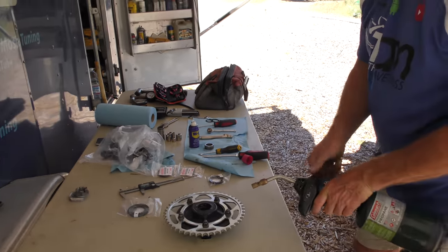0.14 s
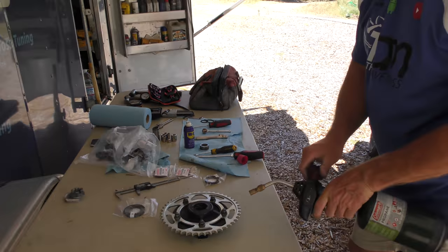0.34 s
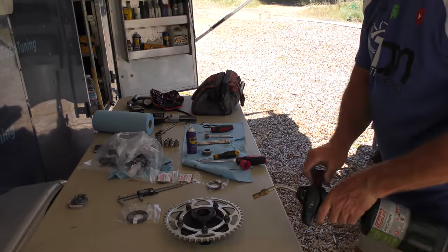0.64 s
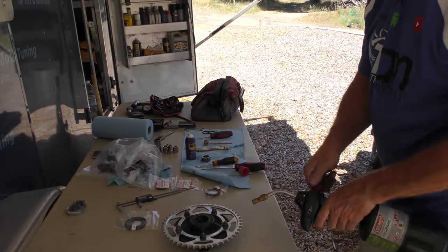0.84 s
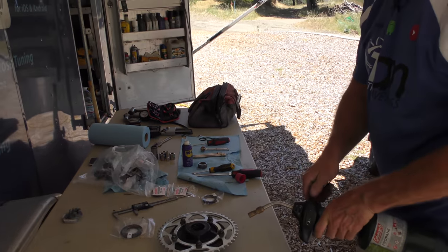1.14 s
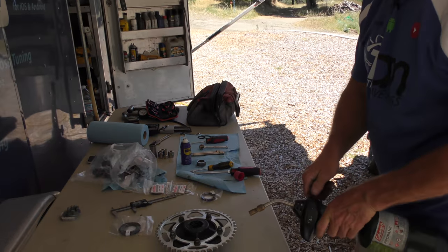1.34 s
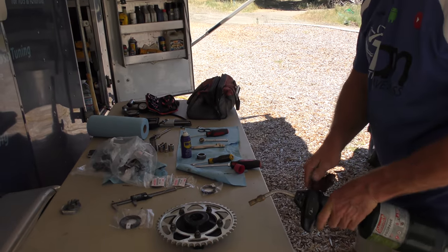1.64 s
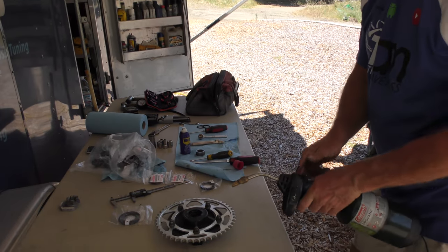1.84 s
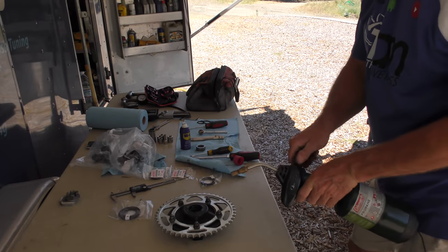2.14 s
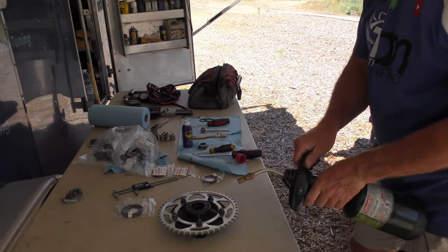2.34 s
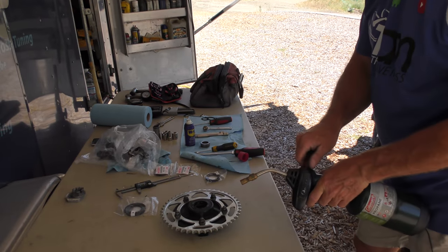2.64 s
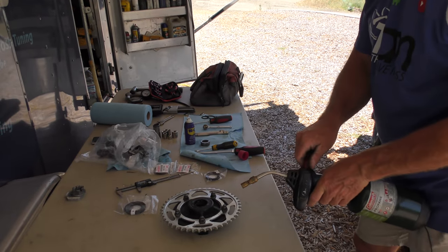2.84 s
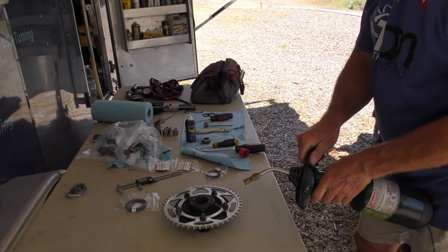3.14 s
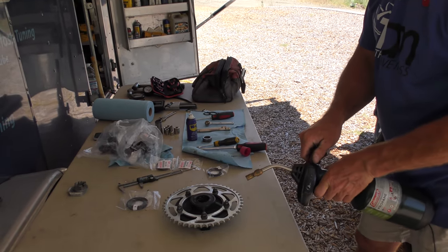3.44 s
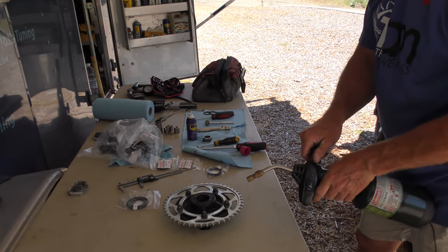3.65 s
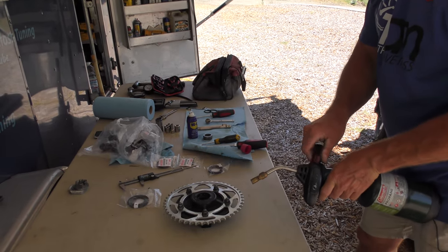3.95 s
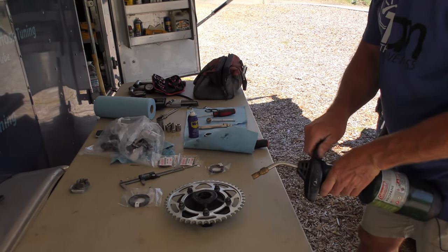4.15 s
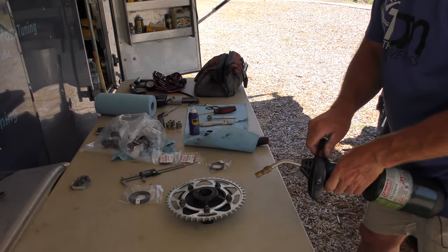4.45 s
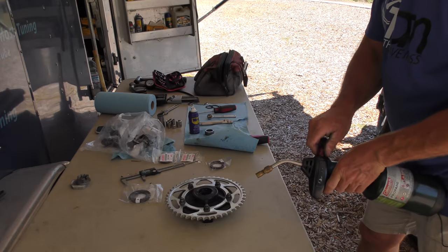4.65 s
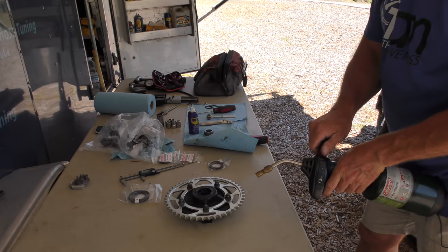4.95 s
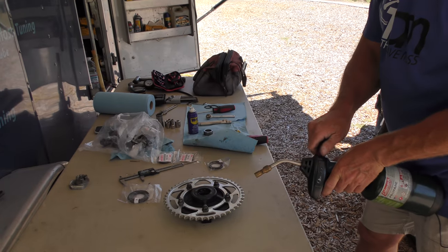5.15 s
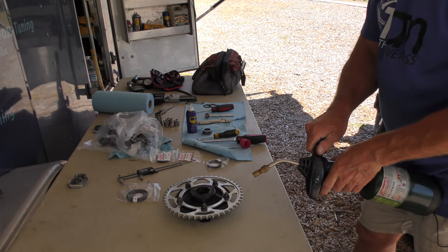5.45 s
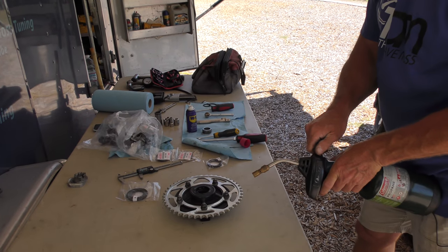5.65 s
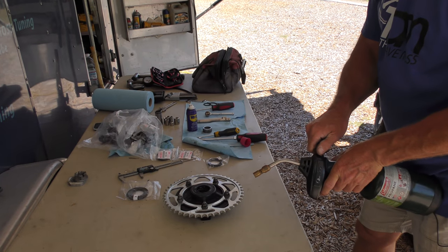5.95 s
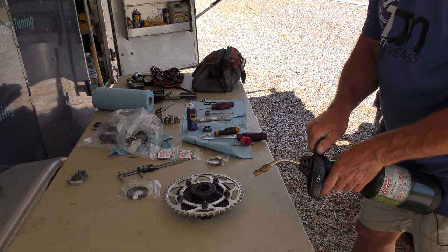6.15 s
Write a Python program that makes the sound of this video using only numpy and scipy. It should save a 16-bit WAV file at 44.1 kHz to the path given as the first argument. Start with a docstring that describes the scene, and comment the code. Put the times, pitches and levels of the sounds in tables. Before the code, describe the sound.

Close outdoor sound of a hand-held gas torch: a thin high hiss with small trigger clicks, then a fluttering, rushing flame for about two seconds that cuts off abruptly. The knob ticks and squeaks faintly over soft gas hiss. A loud igniter snap fails to light it; a second snap about a second later starts a steady roar to the end. Light breeze rumbles low on the microphone.

```python
"""A hand-held propane torch burns as turbulent noise in four bands, combed by an echo from an outdoor table.
Unlit gas hisses first as coloured noise and a narrow jet; a fluttering flame catches, burns two seconds and dies.
The valve knob creaks in gliding harmonic tones, and clicks are short noise bursts with pings and knocks.
The igniter snaps once in vain, then again, each a noise crack with ringing modes, and a roar holds.
A light breeze of low, gusty noise rumbles underneath."""
import sys
import numpy as np
from scipy import signal
from scipy.fft import rfft, irfft, next_fast_len
from scipy.io import wavfile
from scipy.ndimage import map_coordinates

SR = 44100
rng = np.random.default_rng(int(sys.argv[2]) if len(sys.argv) > 2 else 0)


def digitize_waveform(pressure):
    """Quantize a signal to 16-bit integers and store it at the path in sys.argv[1].

    Rows of a 2-D input are taken as channels; values are limited to [-1, 1].
    """
    field = np.atleast_2d(pressure).T
    bounded = np.clip(field, -1, 1)
    quanta = np.round(bounded * 32767).astype(np.int16)
    wavfile.write(sys.argv[1], SR, quanta)


N = 277212
TIME = np.arange(N) / SR
FFT_SIZE = 2 * next_fast_len(N // 2 + 1)
FREQS = np.maximum(np.fft.rfftfreq(FFT_SIZE, 1 / SR), 1)

# All colour and slope tables give relative spectral density; response() scales them to unit power.
# Unlit gas in the burner tube: (time [s], level [dB])
GAS_LEVEL = [(0, -57.5), (0.4, -63), (3.1, -57.5), (3.6, -56.5), (4.45, -50.5), (4.6, -55), (6.29, -79)]
# Slope of the unlit gas noise: (frequency [Hz], density [dB per Hz])
GAS_SPECTRUM = [(150, 0), (300, 9.5), (600, 8), (1300, 4.5), (2200, -0.5), (4000, 0), (7000, 1.5),
                (9500, -0.5), (12000, -4.5), (16000, -7)]
# Resonances of the burner tube: (centre [Hz], width [Hz], height [dB])
TUBE_RESONANCES = [(1320, 65, 13.5), (2726, 110, 10.5), (4050, 650, 8), (4800, 640, -6), (6040, 460, 3),
                   (9500, 1300, 4.5)]
# Thin jet of unlit gas: (time [s], pitch [Hz], relative flow [dB])
LEAK_JET = [(0, 12200, -4), (0.12, 13000, 0.5), (0.21, 12400, -1.5), (0.27, 11300, -8), (0.35, 11700, -19),
            (0.42, 11400, -18)]
# Soft rush around the jet: (frequency [Hz], density [dB per Hz])
LEAK_RUSH_COLOUR = [(120, -32), (200, -12), (355, -5.5), (1120, -12), (1340, -23), (2150, -20.5),
                    (3810, -28), (4270, -20), (10000, -53), (13000, -66), (22000, -120)]
LEAK_RUSH_FOLLOWS = 0.44   # share of the flow's swing in dB
# Breeze: (time [s], level [dB])
BREEZE_LEVEL = [(0, -50.5), (0.7, -41.5), (1.35, -47.5), (1.95, -55), (2.6, -39), (3.2, -56), (3.8, -43.5),
                (4.25, -50), (4.65, -47), (4.85, -52), (5.8, -54), (6.29, -47.5)]
# Colour of the breeze: (frequency [Hz], density [dB per Hz])
BREEZE_SPECTRUM = [(15, -29), (28, -0.5), (52, -5), (80, -7.5), (120, -13), (200, -24.5), (400, -42.5),
                   (1500, -59.5)]
GUST_DB, GUSTS_PER_S = 2, 6.5
SHAKE_DB, SHAKE_T60_S = -32, 0.17   # low rumble that each igniter snap shakes loose
# Trigger and knob clicks: (time [s], relative tick [dB], tick pitch [Hz], hollow knock [dB])
HANDLE_CLICKS = [(0.134, -32, 6600, -36.5), (0.221, -37, 6060, -44), (0.261, -30, 5940, -50),
                 (0.292, -44, 3600, -40.5), (0.453, -23, 3670, -34), (0.461, -29, 1145, -33),
                 (0.508, -38.5, 1370, -31), (0.579, -41, 3850, -37), (0.616, -32, 6600, -47),
                 (1.7858, -27.5, 4145, -50), (2.04, -33, 5940, -50), (3.041, -35, 3540, -41),
                 (3.08, -56, 3500, -49.5), (3.189, -45, 3100, -42), (3.324, -43, 5900, -54),
                 (3.379, -34, 3550, -39), (3.425, -37, 3180, -45), (3.615, -36, 3600, -52),
                 (3.642, -25, 3370, -36), (3.645, -25.5, 3100, -39), (3.664, -47, 3070, -29.5),
                 (3.738, -19.5, 3570, -39), (3.854, -50, 3500, -47), (3.9692, -40, 3730, -48.5),
                 (4.1214, -39, 3160, -47), (4.2989, -27.5, 3680, -42.5), (4.339, -43, 3600, -45.5),
                 (4.4488, -31, 3030, -49), (4.651, -22.5, 3850, -35), (4.656, -19.5, 3320, -31),
                 (4.672, -33, 3140, -40)]
# Colour of a tick: (frequency [Hz], density [dB per Hz])
TICK_SPECTRUM = [(700, -3), (1900, -3), (2500, -18), (3200, 0.5), (3900, 3.5), (4900, -10.5), (6400, -1),
                 (8000, -13.5), (10000, -8), (16000, -20)]
# Colour of a knock: (frequency [Hz], density [dB per Hz])
KNOCK_SPECTRUM = [(100, -11), (400, -16), (600, -6), (780, 3), (1100, -10.5), (1700, -14), (2500, -20.5),
                  (6000, -40.5)]

# Fluttering flame: (time [s], strength [dB], relative brightness [dB])
FLUTTERING_FLAME = [(0.76, -36.5, -2), (0.98, -39, -1), (1.45, -35.5, -1.5), (1.55, -40, -1),
                    (1.70, -41.5, 0.5), (1.84, -44, -0.5), (1.93, -41.5, 0), (2.04, -37.5, -0.5),
                    (2.22, -35.5, -1.5), (2.43, -33.5, 0), (2.56, -36, -1.5), (2.63, -34, 0),
                    (2.69, -35.5, -1)]
# Steady flame: (time [s], strength [dB], relative brightness [dB])
STEADY_FLAME = [(4.52, -33, -1), (4.85, -33.5, 0), (5.17, -35.5, 0), (5.43, -32, -0.5), (5.55, -37, 0),
                (6.05, -37, -0.5), (6.21, -34, -0.5), (6.28, -41.5, 0.5)]
# Overall slope of the fluttering flame: (frequency [Hz], density [dB per Hz])
FLUTTERING_SPECTRUM = [(50, -34), (110, -13), (200, -1), (450, -3), (1300, -11.5), (2000, -16.5),
                       (4000, -25), (8000, -31.5), (15500, -44.1)]
# Overall slope of the steady flame: (frequency [Hz], density [dB per Hz])
STEADY_SPECTRUM = [(50, -36), (110, -16.5), (200, -6.5), (450, -2), (1300, -5.5), (2000, -11),
                   (4000, -14.5), (8000, -21), (15500, -33)]
# Peaks and dips from the burner and nearby surfaces: (centre [Hz], width [Hz], height [dB])
FLAME_RIPPLE = [(303, 50, 2.5), (371, 34, -8), (449.6, 80, 8.5), (520, 136, -2), (606.4, 51, 8),
                (743, 20, -8), (848, 56, 7), (974, 19, 4), (1004, 35, -15), (1050, 180, 6), (1220, 63, -1),
                (1272, 82, 8), (1377, 69, 10), (1790, 67, 7), (1950, 18, 8.5), (2176, 39, 13),
                (1515, 93, 5), (1640, 120, 5.5), (2308, 370, -6.5), (2930, 32, 1.5), (3360, 34, 1),
                (3600, 400, 3), (3950, 1140, 5), (4800, 68, 0), (5230, 700, -9), (6370, 1800, 3),
                (7470, 850, -5.5), (9100, 550, 1.5), (14100, 1137, 1)]
# Fluttering flame at the usual strength: roar, rush, hiss, sizzle (level [dB] each)
FLUTTERING_BAND_LEVELS = [-32, -35, -44.5, -52.5]
# Steady flame at the usual strength: roar, rush, hiss, sizzle (level [dB] each)
STEADY_BAND_LEVELS = [-35.5, -37, -45, -54]
# One row per flame band: (share of strength swing [dB per dB], share of brightness [dB per dB])
BAND_SHARES = [(.6, 0), (1, 2.7), (1, 0.49), (1.1, 3.6)]
USUAL_STRENGTH_DB = -37
# The flame nearly lifts off the nozzle: (time [s], dip [dB])
FLAME_FALTERS = [(0.95, -6), (1.255, -1.5), (1.637, -7), (2.12, -5.5)]
# The flame catches hold and its roar swells: (time [s], swell [dB])
FLAME_PUFFS = [(0.71, 0), (1.67, 7), (2.68, 3), (4.575, 6.5)]
FALTER_S, PUFF_S = 0.0089, 0.02
# Table echo, following the nozzle's height: (time [s], lag [ms])
ECHO_LAG = [(1.0, .735), (1.53, .76), (1.78, 1.02), (2.08, 1.13), (2.5, .96), (4.5, .93), (6.29, .89)]
SECOND_LIT_S, SECOND_ATTACK_S = 4.48, 0.044   # the second snap lights the steady flame

# Stick-slip of the knob: (start [s], length [s], start pitch [Hz], end pitch [Hz], level [dB])
KNOB_CREAKS = [(2.912, 0.016, 774, 705, -52), (2.962, 0.081, 676, 820, -47.5),
               (3.165, 0.062, 858, 675, -51.5), (3.719, 0.019, 737, 770, -42),
               (4.13, 0.047, 658, 784, -43.5), (4.196, 0.023, 880, 665, -42)]
# Harmonics of a creak: (multiple of the pitch [1], relative level [dB])
CREAK_HARMONICS = [(1, 0.5), (2, -10.5), (3, -18), (4, -14)]
FIDGETS_PER_S, FIDGET_SPAN = 7, (2.95, 4.3)   # span in s
FIDGET_TICK_DB, FIDGET_KNOCK_DB = -58, -52   # levels of the largest fidgets
# Igniter snaps: (time [s], level [dB], thump [dB], metal ring [dB])
IGNITER_SNAPS = [(3.445, -6, -13.5, -33.5), (4.4753, -7.5, -20, -36)]
# Colour of the crack: (frequency [Hz], density [dB per Hz])
CRACK_SPECTRUM = [(150, -5.5), (300, -5.5), (550, -9), (900, -4), (1300, -20), (2050, -2), (2600, -6.5),
                  (3300, -3.5), (3900, 10.5), (5000, -22.5), (6500, -5.5), (8200, -16.5), (10300, -4),
                  (13000, -23.5), (16000, -11)]
# Scatter from the table and the things on it: (frequency [Hz], density [dB per Hz])
SCATTER_SPECTRUM = [(150, -3), (320, 2), (560, -9), (1000, -6), (1450, 1), (2100, -3), (2600, -7),
                    (3200, 1.5), (3800, -0.5), (5000, -10.5), (6500, -8), (8200, -12.5), (10300, -9.5),
                    (16000, -18)]
# Ring of the metal torch head: (frequency [Hz], relative level [dB], t60 [s])
HEAD_MODES = [(1260, -14, 0.41), (1600, -13, 0.73), (1670, -14, 0.3), (3010, 0, 0.16), (3380, -13, 0.17),
              (3490, -2, 0.33), (3760, -13, 0.14), (4650, -20, 0.41), (6700, -16, 0.26)]
# Low modes of the plastic handle: (frequency [Hz], relative level [dB], t60 [s])
HANDLE_MODES = [(119, 0, 0.027), (200, -3, 0.04), (275, -6, .04), (405, -21, 0.028)]
# Soft jolts of the gas bottle in the hand: (start [s], length [s], frequency [Hz], level [dB])
BOTTLE_JOLTS = [(3.674, 0.096, 48.8, -24.5), (3.785, 0.037, 198, -42.5), (4.424, 0.11, 63, -29.5)]
STOPBAND_HZ = 16600


def from_db(db):
    """Logarithmic level: 20 dB is a tenfold amplitude."""
    return 10 ** (np.asarray(db) / 20)


def rms_one(x):
    """Power normalisation: scale to unit mean square."""
    return x / np.sqrt(np.mean(x ** 2) + 1e-20)


def in_time(rows):
    """Linear interpolation: each column of a curve at every sample."""
    times, *columns = np.transpose(rows)
    return [np.interp(TIME, times, column) for column in columns]


def between(start, end, fade):
    """Amplitude gating: a gain that opens from start and is shut by end."""
    return np.clip((TIME - start) / fade, 0, 1) * np.clip((end - TIME) / fade, 0, 1)


def swells(rows, width_s):
    """Gaussian level modulation: a brief bell-shaped change in dB at each event."""
    return sum(db * np.exp(-((TIME - s) / width_s) ** 2) for s, db in rows)


def response(slope, bells=()):
    """Spectral shaping: a smooth slope plus bell-shaped peaks and dips, at unit power."""
    hz, db = np.transpose(slope)
    curve = np.interp(np.log(FREQS), np.log(hz), db)
    # Below the first point the curve falls a further 24 dB per octave.
    curve = curve - 24 * np.maximum(np.log2(hz[0] / FREQS), 0)
    for centre, width, height in bells:
        curve = curve + height * np.exp(-4 * np.log(2) * ((FREQS - centre) / width) ** 2)
    return rms_one(from_db(curve))


def colour(x, gain):
    """Minimum-phase filtering: folding the cepstrum makes the filter causal, so nothing sounds early."""
    cepstrum = irfft(np.log(gain + 1e-6))
    fold = 1 + np.sign(FFT_SIZE / 2 - np.arange(FFT_SIZE))
    fold[0] = 1
    causal_gain = np.exp(rfft(cepstrum * fold))
    return irfft(rfft(x, FFT_SIZE) * causal_gain)[:N]


def noise(gain):
    """Stationary random noise: a white spectrum weighted by a gain, with rms 1."""
    white = rng.standard_normal(FFT_SIZE)
    return rms_one(irfft(rfft(white) * gain)[:N])


def drift(rate):
    """Low-pass random fluctuation: wandering up to about rate times a second, with rms 1."""
    return noise(1 / (1 + (FREQS / rate) ** 2))


def decays(times, levels_db, t60):
    """Exponential decay: each kick loses 60 dB in t60 seconds."""
    kicks = np.zeros(N)
    kicks[np.round(np.asarray(times) * SR).astype(int)] = from_db(levels_db)
    return signal.lfilter([1], [1, -from_db(-60 / (t60 * SR))], kicks + 1e-18)


def ring(times, levels_db, hz, t60):
    """Damped oscillation: one mode set ringing at each time."""
    out = 0
    for s, db in zip(times, levels_db):
        age = np.maximum(TIME - s, 0)
        out = out + from_db(db - 60 * np.minimum(age / t60, 4)) * np.sin(2 * np.pi * hz * age)
    return out


def burst(times, levels_db, length, tail_db, tail_t60):
    """Impact noise: a brief contact followed by decaying scatter from the things around."""
    contact = signal.windows.tukey(max(int(length * SR), 8), .4)
    impulses = decays(times, levels_db, 1 / SR)
    direct = signal.fftconvolve(impulses, contact)[:N]
    tail = decays(times, levels_db + tail_db, tail_t60)
    return (direct + tail) * rng.standard_normal(N)


def unlit_gas():
    """Resonance of a tube: cold gas flow noise is strengthened in bands at the burner tube's modes."""
    level_db, = in_time(GAS_LEVEL)
    return from_db(level_db) * noise(response(GAS_SPECTRUM, TUBE_RESONANCES))


def leak(width_hz, skirt_db, sizzle_db, rush_db):
    """Jet noise: a carrier of changing pitch times random eddies gives a narrow sizzle, over a soft rush."""
    centre_hz, flow_db = in_time(LEAK_JET)
    eddies = drift(width_hz) + from_db(skirt_db) * drift(4.0 * width_hz)   # the second adds broad skirts
    carrier = np.cos(2 * np.pi * np.cumsum(centre_hz) / SR)
    sizzle = from_db(flow_db + sizzle_db) * rms_one(eddies * carrier)
    rush = from_db(LEAK_RUSH_FOLLOWS * flow_db + rush_db) * noise(response(LEAK_RUSH_COLOUR))
    return (sizzle + rush) * between(-1, 1.0, 0.24)


def diffuse_echoes(x):
    """Diffuse reflection: a faint, dense, random treble echo tail follows within some milliseconds."""
    age = TIME[:int(.03 * SR)]
    echoes = rng.standard_normal(len(age)) * np.exp(-age / .007) * (age > .002)
    echoes = signal.sosfilt(signal.butter(2, 2000, "high", fs=SR, output="sos"), echoes)
    echoes = echoes / np.linalg.norm(echoes)
    return .96 * (x + .3 * signal.fftconvolve(x, echoes)[:N])


def breeze():
    """Wind turbulence: low noise swells in random gusts, with a decaying rumble after each snap."""
    level_db, = in_time(BREEZE_LEVEL)
    air = from_db(level_db + GUST_DB * drift(GUSTS_PER_S))
    shake = decays([s for s, *_ in IGNITER_SNAPS], SHAKE_DB, SHAKE_T60_S)
    return (air + shake) * noise(response(BREEZE_SPECTRUM))


def clicks(tick_s, scatter_db, scatter_t60, knock_t60, ping_share, ping_q):
    """Impact excitation: each contact ticks, pings a resonance and knocks the hollow plastic shell."""
    times, tick_db, tick_hz, knock_db = np.transpose(HANDLE_CLICKS)
    contacts = burst(times, tick_db, tick_s, scatter_db, scatter_t60)
    out = 0.32 * colour(contacts, response(TICK_SPECTRUM))
    starts = (times * SR).astype(int)
    for start, end, hz in zip(starts, [*starts[1:], N], tick_hz):
        b, a = signal.iirpeak(hz, ping_q, fs=SR)
        ping = signal.lfilter(b, a, contacts[start:max(end, start + 1)])
        # Make up for the power that the narrow filter removes.
        out[start:start + len(ping)] += ping_share * np.sqrt(ping_q * SR / (np.pi * hz)) * ping
    knocks = decays(times, knock_db, knock_t60) * rng.standard_normal(N)
    return out + colour(knocks, response(KNOCK_SPECTRUM))


def over_table(x, echo_share, dull_hz):
    """Comb interference: one dulled early echo from the table top; the notches slide as the torch moves."""
    lag_ms, = in_time(ECHO_LAG)
    echo = irfft(rfft(x, FFT_SIZE) / np.sqrt(1 + (FREQS / dull_hz) ** 2))
    return x + echo_share * map_coordinates(echo, [np.arange(N) - lag_ms * SR / 1000], order=3)


def flame(curve, slope, bands_db, flutter_db, crackle_db, roar_share):
    """Turbulent combustion: the flame front flaps and tears, shaking the treble more than the low roar."""
    gain = response(slope, FLAME_RIPPLE)
    strength_db, bright_db = in_time(curve)
    swing_db = strength_db - USUAL_STRENGTH_DB
    falter_db = swells(FLAME_FALTERS, FALTER_S)
    levels = [db + follows * swing_db + tilt * bright_db + falter_db
              for db, (follows, tilt) in zip(bands_db, BAND_SHARES)]
    levels[0] = levels[0] + swells(FLAME_PUFFS, PUFF_S)
    turbulence_db = flutter_db * drift(22) + crackle_db * drift(430)
    # Differences of successive high-passes split the power into roar, rush, hiss and sizzle.
    above = [1, *(1 / (1 + (hz / FREQS) ** 12) for hz in (700, 2400, 7500)), 0]
    bands = [np.maximum(low - high, 0) for low, high in zip(above, above[1:])]
    out = 0
    for band, level_db, share in zip(bands, levels, np.linspace(roar_share, 1, len(bands))):
        eddies = rng.standard_normal(N) * from_db(share * turbulence_db)
        heard = over_table(colour(eddies, gain * np.sqrt(band)), echo_share=0.36, dull_hz=10000)
        out = out + from_db(level_db) * rms_one(heard)
    return out


def burning(lit_s, shut_s, attack_s, dying_db_per_s):
    """Growth and decay: a flame builds up once lit, holds, and dies away when the gas is shut off."""
    growth = np.clip((TIME - lit_s) / attack_s, 0, 1) ** 2
    return growth * from_db(-dying_db_per_s * np.clip(TIME - shut_s, 0, 1))


def creaks(jitter):
    """Stick-slip friction: the knob slips several hundred times a second in short gliding squeaks."""
    out, wobble = np.zeros(N), 1 + jitter * drift(220)
    for start, length, start_hz, end_hz, level_db in KNOB_CREAKS:
        at = np.arange(int(start * SR), int((start + length) * SR))
        pitch_hz = np.linspace(start_hz, end_hz, len(at)) * wobble[at]
        phase = 2 * np.pi * np.cumsum(pitch_hz) / SR
        tone = sum(from_db(db) * np.sin((k + 1) * phase) for k, (_, db) in enumerate(CREAK_HARMONICS))
        out[at] += from_db(level_db) * signal.windows.tukey(len(at), .5) * tone
    return out


def fidgets(tick_t60, knock_t60):
    """Random impacts: faint, irregular ticks and knocks as the grip shifts."""
    draws = rng.random((int(FIDGETS_PER_S * np.ptp(FIDGET_SPAN)), 2))
    times = np.interp(draws[:, 0], [0, 1], FIDGET_SPAN)
    size_db = -6 * draws[:, 1]
    ticks = decays(times, FIDGET_TICK_DB + size_db, tick_t60) * noise(response(TICK_SPECTRUM))
    knocks = decays(times, FIDGET_KNOCK_DB + size_db, knock_t60) * noise(response(KNOCK_SPECTRUM))
    return ticks + knocks


def igniter(crack_s, scatter_db, scatter_t60, yard_db, yard_t60):
    """Modal impact: a spring hammer cracks, scatters off table and yard, thumps the handle and rings metal."""
    times, level_db, thump_db, ring_db = np.transpose(IGNITER_SNAPS)
    hits = burst(times, level_db, crack_s, tail_db=-11, tail_t60=0.034)
    crack = colour(hits, response(CRACK_SPECTRUM))
    echoes = decays(times, level_db + scatter_db, scatter_t60) + decays(times, level_db + yard_db, yard_t60)
    scatter = echoes * noise(response(SCATTER_SPECTRUM))
    # Each metal mode flickers in level by a few dB.
    metal = sum(ring(times, ring_db + db, hz, t60) * from_db(3.5 * drift(90)) for hz, db, t60 in HEAD_MODES)
    # The thump starts 2.36 ms late, and successive modes alternate in sign.
    thump = sum((-1) ** k * ring(times + 0.00236, thump_db + db, hz, t60)
                for k, (hz, db, t60) in enumerate(HANDLE_MODES))
    return crack + scatter + metal - thump


def jolts():
    """Low-frequency oscillation: each jolt is a few slow cycles that swell and fade."""
    return sum(from_db(db) * between(start, start + length, length / 2) * np.sin(2 * np.pi * hz * (TIME - start))
               for start, length, hz, db in BOTTLE_JOLTS)


def gain_control(x, threshold_db, release_db_per_s, attack_s):
    """Dynamic compression: peaks over the threshold turn the gain down in milliseconds; it recovers slower."""
    over_db = np.maximum(20 * np.log10(np.abs(x) + 1e-9) - threshold_db, 0)
    release_db = release_db_per_s * TIME
    held_db = np.maximum.accumulate(over_db + release_db, axis=-1) - release_db   # falls at a steady rate
    keep = np.exp(-1 / (attack_s * SR))
    return x * from_db(-signal.lfilter([1 - keep], [1, -keep], held_db))


def scene():
    """Superposition: gas, two flames, the handling of the torch and a breeze add in open air."""
    first = flame(FLUTTERING_FLAME, FLUTTERING_SPECTRUM, FLUTTERING_BAND_LEVELS,
                  flutter_db=1.5, crackle_db=4.0, roar_share=0.68)
    second = flame(STEADY_FLAME, STEADY_SPECTRUM, STEADY_BAND_LEVELS,
                   flutter_db=1.0, crackle_db=2.5, roar_share=0.65)
    flames = (first * burning(lit_s=0.654, shut_s=2.695, attack_s=0.041, dying_db_per_s=460)
              + second * np.clip((TIME - SECOND_LIT_S) / SECOND_ATTACK_S, 0, 1))
    gas = unlit_gas() + leak(width_hz=440, skirt_db=5, sizzle_db=-51, rush_db=-48.0)
    snaps = igniter(crack_s=0.0021, scatter_db=-11.5, scatter_t60=0.088, yard_db=-33, yard_t60=0.31)
    handle = clicks(tick_s=0.0026, scatter_db=-12.5, scatter_t60=0.12, knock_t60=0.075,
                    ping_share=0.31, ping_q=16)
    handle = handle + creaks(jitter=0.073) + fidgets(tick_t60=0.04, knock_t60=0.087)
    return (diffuse_echoes(flames + gas) + snaps + handle + jolts() + breeze())[None]


def record(dry):
    """Compression, saturation and low-pass: loud peaks duck the gain and are rounded, and the top is cut."""
    ceiling = .55
    held = gain_control(dry, threshold_db=-2.5, release_db_per_s=41.5, attack_s=0.0035)
    rounded = ceiling * np.tanh(held / ceiling)
    return signal.sosfilt(signal.cheby2(16, 70, STOPBAND_HZ, fs=SR, output="sos"), rounded)


dry = scene()
out = record(dry)
digitize_waveform(out)
```